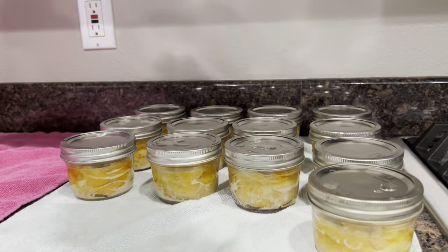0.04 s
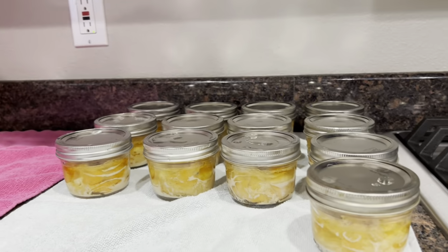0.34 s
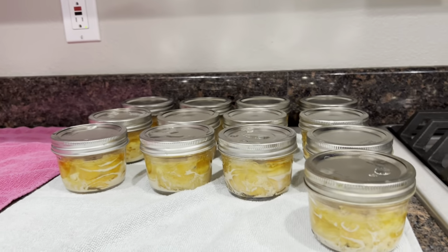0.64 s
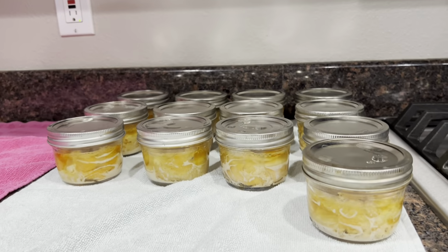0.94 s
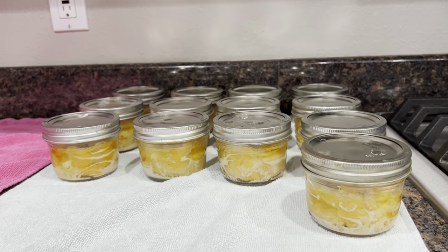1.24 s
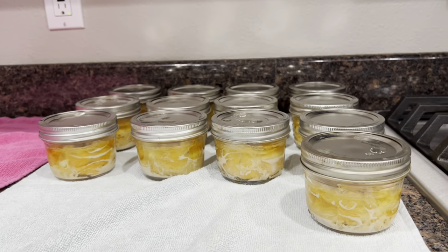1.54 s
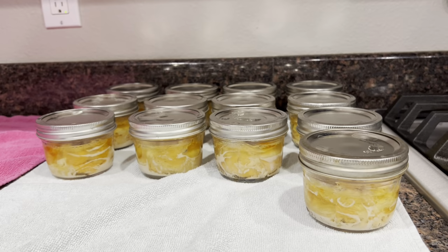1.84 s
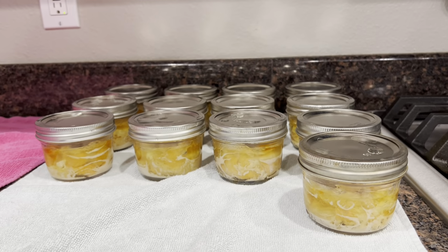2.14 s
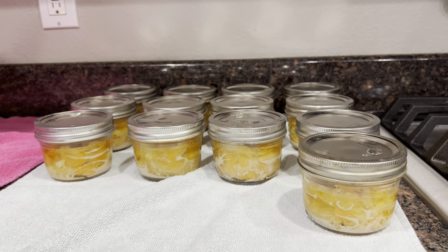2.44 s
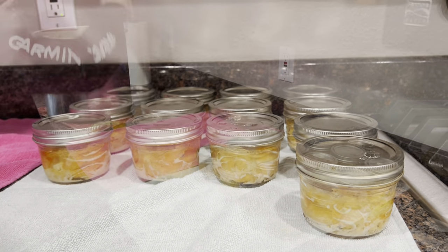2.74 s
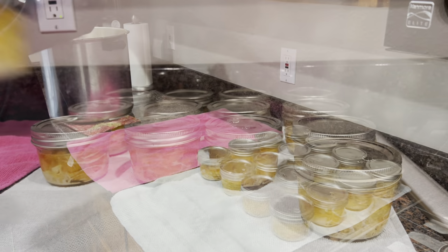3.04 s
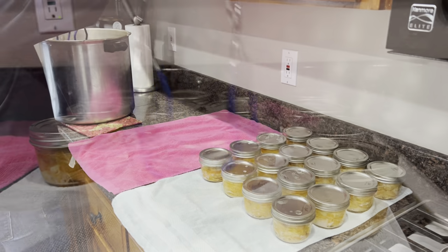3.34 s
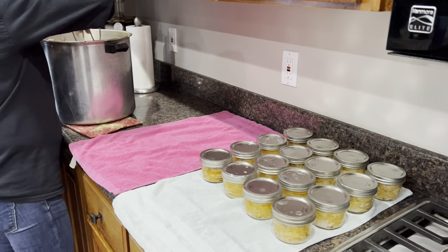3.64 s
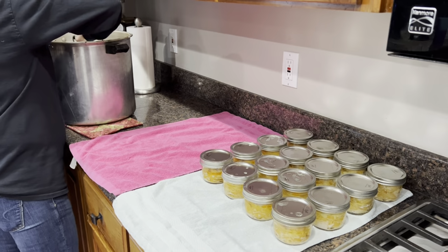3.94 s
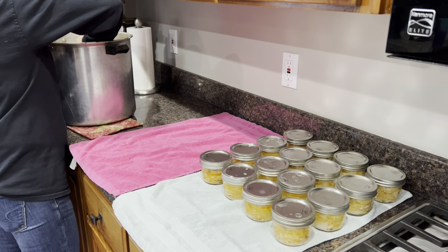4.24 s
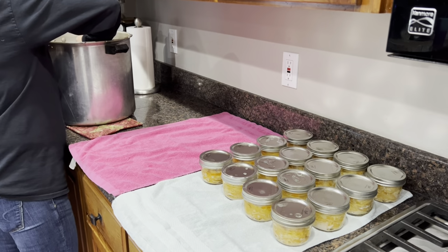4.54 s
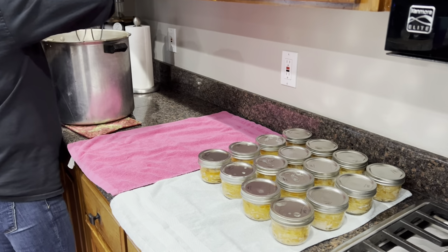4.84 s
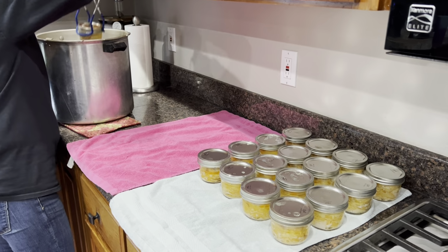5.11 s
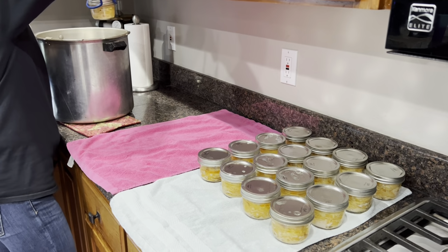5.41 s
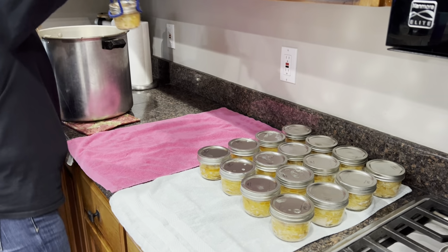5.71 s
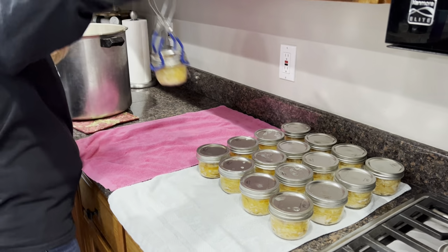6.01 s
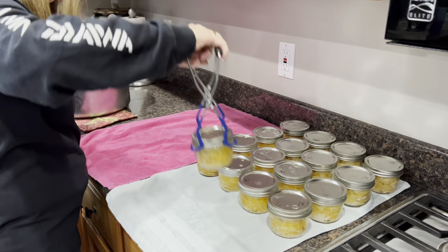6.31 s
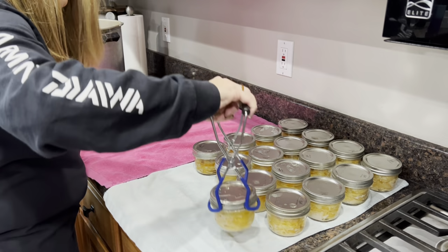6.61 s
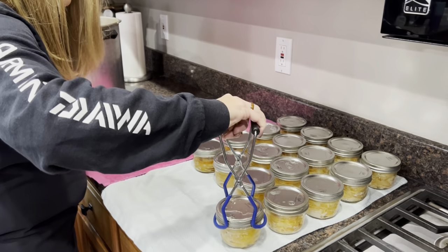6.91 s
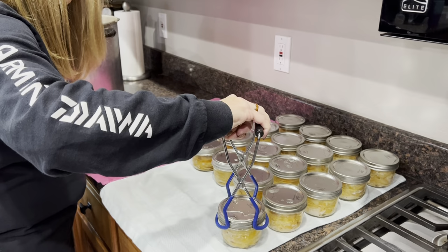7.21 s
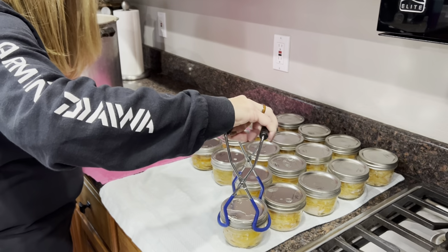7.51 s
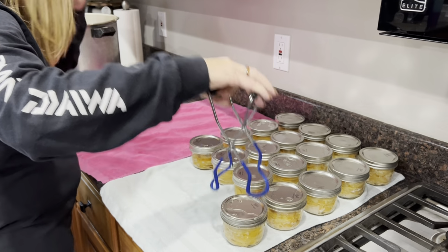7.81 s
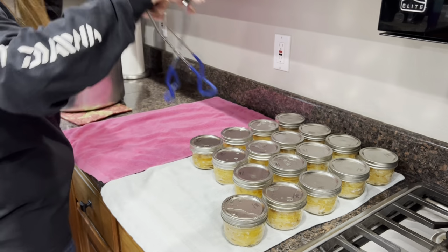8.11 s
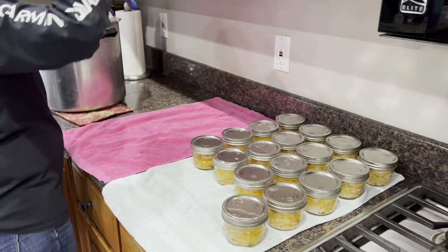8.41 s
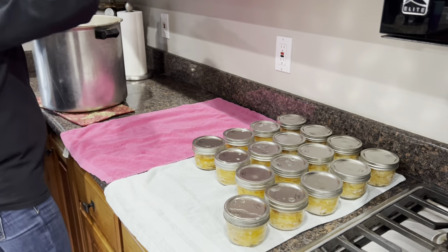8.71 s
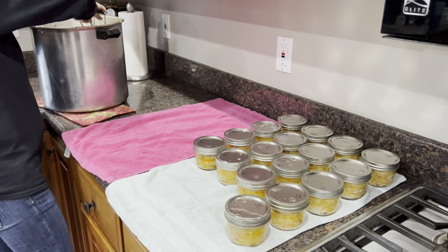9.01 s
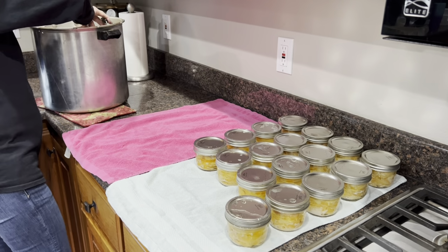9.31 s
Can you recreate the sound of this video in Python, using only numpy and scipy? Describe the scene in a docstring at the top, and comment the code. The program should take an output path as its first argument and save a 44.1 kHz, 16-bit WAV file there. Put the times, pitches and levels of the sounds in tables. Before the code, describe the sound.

In a quiet kitchen with a low appliance hum, two metal jar lids pop with short, ringing pings as hot jars cool. Faint ticks come between. Wire tongs knock lightly inside a big metal pot with a small slosh of water. A third, brighter lid pings, then the tongs scrape and rattle as they let go of a jar. The sounds are fairly close, with a short ring from the hard room.

```python
"""Three lids of hot preserving jars snap down under the vacuum and ping as they cool on a kitchen counter.
Wire tongs slide and knock in the canning pot, carry a jar over, then scrape and rattle as they let it go.
Cooling metal ticks and water sloshes in between, among faint tones, breathy puffs and swishes.
Kitchen appliances hum underneath, and the hard room rings after each sound."""
import sys
import numpy as np
from scipy import signal
from scipy.fft import rfft, irfft
from scipy.io import wavfile
from scipy.ndimage import uniform_filter1d

SR = 44100
rng = np.random.default_rng(int(sys.argv[2]) if len(sys.argv) > 2 else 0)


def store_wav(level_fs):
    """Save 16-bit WAV to argv[1]."""
    pcm = np.round(np.clip(np.atleast_2d(level_fs), -1, 1) * 32767)
    wavfile.write(sys.argv[1], SR, pcm.T.astype(np.int16))


N = 412335
TIME = np.arange(N) / SR
AGE = np.arange(SR // 2) / SR  # seconds since a hit


def amp(db):
    """Decibels to gain."""
    return 10 ** (np.asarray(db) / 20)


def unit(x):
    """Scales to rms 1."""
    return x / np.sqrt(np.mean(x ** 2) + 1e-20)


def read(curve, hz):
    """Reads a curve on a log-frequency axis."""
    points_hz, values = np.transpose(curve)
    return np.interp(np.log(hz + 1), np.log(points_hz + 1), values)


def add(mix, start, sound):
    """Mixes a stereo sound in at a start in seconds."""
    part = mix[:, round(start * SR):][:, :sound.shape[-1]]
    part += sound[..., :part.shape[-1]]


def rise(attack):
    """A smooth fade-in for a hit, over attack seconds."""
    return np.sin(np.pi / 2 * np.minimum(AGE / attack, 1)) ** 2


def envelope(start, attack, hold, release):
    """Rises from 0 to 1, holds and falls back; times in seconds."""
    return np.interp(TIME, start + np.cumsum([0, attack, hold, release]), [0, 1, 1, 0])


def band(centre_hz, octaves):
    """A noise colour with one broad hump."""
    hz = np.geomspace(50, 20000, 40)
    return np.transpose([hz, -4 * (np.log2(hz / centre_hz) / octaves) ** 2])


def noise(colour, size, likeness, tilt_db=0.):
    """Coloured stereo noise, partly alike left and right, tilted by tilt_db per octave above 1 kHz."""
    hz = np.fft.rfftfreq(size, 1 / SR)
    left, other = rfft(rng.standard_normal((2, size)))
    right = likeness * left + np.sqrt(1 - likeness ** 2) * other
    eq_db = read(colour, hz) + tilt_db * np.log2(np.maximum(hz, 1000) / 1000)
    return unit(irfft(np.array([left, right]) * amp(eq_db), size))


def burst(colour, t60, tilt_db=0., likeness=0.39):
    """The crack of a blow: noise that falls 60 dB in t60 seconds."""
    return noise(colour, len(AGE), likeness, tilt_db) * amp(-60 * AGE / t60)


def grainy_swell(middle, length, db, centre_hz, octaves):
    """Grainy noise that swells and fades around a midpoint; returns its start and its sound."""
    size = round(length * SR)
    grain = amp(1.6 * unit(uniform_filter1d(rng.standard_normal(SR), 200)))
    texture = noise(band(centre_hz, octaves), SR, likeness=.4) * grain
    return max(middle - length / 2, 0), amp(db) * texture[:, :size] * signal.windows.tukey(size, .7)


def ring(modes):
    """Dying sines of alternating sign, phase-shifted between left and right: modes x channels x time."""
    hz, db, t60, lead = np.transpose(modes)[:, :, None, None]
    sign = (-1) ** np.arange(len(modes))[:, None, None]
    phase = 2 * np.pi * hz * AGE + lead * np.array([[.5], [-.5]])
    return sign * amp(db - 60 * AGE / t60) * np.sin(phase)


def struck(modes, detune, spread_db, tilt_db=0.):
    """Every blow lands on another spot, which shifts and reweights the modes."""
    varied = []
    for hz, db, t60, lead in modes:
        pitch = hz * (1 + detune * rng.standard_normal())
        level = db + spread_db * rng.standard_normal() + tilt_db * np.log2(hz / 3000)
        varied.append((pitch, level, t60, lead))
    return ring(varied).sum(0)


def wavering(hz, width_hz):
    """A tone whose strength and phase drift, smearing its pitch over a narrow band."""
    offset_hz = np.fft.fftfreq(N, 1 / SR)
    drift = np.fft.ifft(np.fft.fft(rng.standard_normal(N)) * np.exp(-(offset_hz / width_hz) ** 2))
    return unit((drift * np.exp(2j * np.pi * hz * TIME)).real)


# The kitchen's reverb. Each row: frequency in Hz, decay (t60) in seconds.
ROOM_DECAY = [(150, 0.37), (500, 0.48), (1000, 0.54), (2500, 0.52), (4500, 0.46), (7000, 0.44),
              (9000, 0.43), (11500, 0.34), (15000, 0.23)]
# Slaps off counter and wall. Each row: left delay and right delay in seconds, relative level in dB.
ECHOES = [(.0031, 0.004, -11), (.0068, 0.0054, -11.5), (0.0128, .0127, -17)]
def kitchen(sound, room_db, pan_db=0):
    """The direct sound, a few near reflections, then a diffuse tail that dies band by band."""
    hz, t, spectrum = signal.stft(rng.standard_normal((2, len(AGE))), SR, nperseg=256)
    decay = amp(-60 * t / read(ROOM_DECAY, hz)[:, None])
    tail = signal.istft(spectrum * decay, SR, nperseg=256)[1][:, :len(AGE)]
    wet = signal.fftconvolve(sound, tail * np.clip((AGE - .002) / 0.011, 0, 1), axes=1)
    wet *= np.sqrt((sound ** 2).sum() / (wet ** 2).sum())
    near = np.zeros((2, len(AGE)))
    near[:, 0] = amp([pan_db / 2, -pan_db / 2])
    for left, right, db in ECHOES:
        near[[0, 1], [round(left * SR), round(right * SR)]] += amp(db + room_db / 2)
    return signal.fftconvolve(sound, near, axes=1) + amp(room_db) * wet


# The bed of rumble and hiss. Each row: frequency in Hz, relative level in dB.
AIR_COLOUR = [(25, -20.5), (45, -4), (72, -0.5), (123, -8.5), (160, -14), (256, -14), (340, -19),
              (714, -26), (887, -32), (1100, -31), (1790, -34), (3200, -41.5), (5000, -45), (8600, -46),
              (10200, -60), (12000, -47), (16000, -67)]
# Its stereo image, wider toward the top. Each row: frequency in Hz, left-right likeness from 0 to 1.
AIR_LIKENESS = [(60, 0.99), (130, 0.89), (290, 0.83), (640, 0.43), (1410, 0.36), (3100, 0.17), (6820, 0.27),
                (15000, 0.1)]
# Appliance hum and the fan's early and late whine. Each row: pitch in Hz, level in dB, width in Hz.
HUM = [(81.7, -66.5, 7), (122.2, -68.5, 5), (248.4, -76.5, 4)]
EARLY_WHINE = [(500, -80, 30), (706, -82, 30), (980, -80.5, 50), (1034, -79, 8), (1056, -80.5, 35)]
LATE_WHINE = [(1113, -85.5, 59)]
# The bed's early and late balance. Each holds: rumble, hiss and hum trims in dB.
EARLY_TRIMS = (0.5, -1.5, 2)
LATE_TRIMS = (-0.79, -2.25, -1)
def appliances():
    """Rumble, hum, soft hiss and a thin fan whine, easing into a slightly quieter tone."""
    air = amp(-60.5) * noise(AIR_COLOUR, N, read(AIR_LIKENESS, np.fft.rfftfreq(N, 1 / SR)))
    rumble = signal.sosfiltfilt(signal.butter(2, 1200, fs=SR, output="sos"), air)
    hiss = air - rumble
    hum = sum(amp(db) * wavering(hz, width) for hz, db, width in HUM)
    lull = amp(-4.5 * envelope(2.61, attack=0.53, hold=0.89, release=0.14))
    blend = np.clip((TIME - 2.7) / 0.65, 0, 1)
    tones = [(1 - blend, EARLY_TRIMS, EARLY_WHINE), (blend, LATE_TRIMS, LATE_WHINE)]
    out = np.zeros((2, N))
    for share, (rumble_db, hiss_db, hum_db), fan in tones:
        whine = sum(amp(db) * wavering(hz, width) for hz, db, width in fan)
        lows = lull * (amp(rumble_db) * rumble + amp(hum_db) * hum)
        out += share * (lows + amp(hiss_db) * hiss + whine)
    drone = amp(-67.5) * envelope(1.77, attack=0.39, hold=0.71, release=0.56) * wavering(128, width_hz=9)
    brief_dip = amp(-43 * envelope(4.625, attack=0.0015, hold=0.02, release=0.0015))
    return (out + drone) * brief_dip


# Light ticks. Each row: start in seconds, relative level in dB, brightness (higher is crisper).
TICKS = [(0.153, -60, -18), (0.3987, -47, -8.5), (1.7123, -53.5, -20), (1.732, -51, -22.5),
         (3.135, -54.5, -2), (3.456, -40.5, -12), (4.464, -65, -12), (5.275, -63, 0), (9.0175, -59, -13.5)]
# A tick's EQ. Each row: frequency in Hz, relative level in dB.
TICK_COLOUR = [(200, -15), (700, -11), (1400, -1), (2800, 2), (6000, -2), (9000, -7), (10200, -22),
               (12000, -9), (16000, -35)]
def ticks():
    """Cooling lids and jar rings give little clicks with no pitch of their own."""
    out = np.zeros((2, N))
    for start, db, brightness in TICKS:
        click = burst(TICK_COLOUR, t60=0.068, tilt_db=0.57 * (brightness + 8.5))
        add(out, start, amp(db - 6.5) * kitchen(click, room_db=-2.0))
    return out


# Soft handling noises. Each row: midpoint in seconds, length in seconds, level in dB.
SCUFFS = [(0.613, 0.098, -71.5), (0.755, 0.086, -68.5), (1.067, 0.13, -76), (2.511, 0.075, -77),
          (3.115, 0.047, -74.5), (4.99, 0.057, -68.5), (5.298, 0.26, -75.5), (8.713, .12, -76),
          (8.888, 0.074, -71.5)]
def scuffs():
    """Brief rubs of handling: the quicker the scuff, the brighter it is."""
    out = np.zeros((2, N))
    for middle, length, db in SCUFFS:
        centre_hz = 2593 * (0.042 / length) ** 0.55
        add(out, *grainy_swell(middle, length, db, centre_hz, octaves=0.76))
    return kitchen(out, room_db=-2.5)[:, :N]


# Faint tones. Each row: start in seconds, pitch in Hz, level in dB, attack and t60 in seconds.
FAINT_TONES = [(1.04, 715, -56, 0.0048, 0.099), (5.195, 1570, -63, .04, .2),
               (5.364, 2110, -49.5, 0.024, 0.095), (5.372, 1410, -50.5, 0.025, 0.097),
               (8.66, 1600, -64, .04, .25)]
def faint_tones():
    """Faint, softly swelling tones that die away quickly, most of them near 1.6 kHz."""
    out = np.zeros((2, N))
    for start, hz, db, attack, t60 in FAINT_TONES:
        tone = ring([(hz, db, t60, .6)])[0] * rise(attack)
        add(out, start, kitchen(tone, room_db=-5.5))
    return out


# The rush's EQ, fullest in the mids. Each row: frequency in Hz, relative level in dB.
RUSH_COLOUR = [(120, -32.5), (300, -14), (730, -7), (1400, -11), (4000, -18.5), (9000, -24), (10200, -41),
               (12000, -31), (16000, -35.5)]
def rush():
    """A soft rush of noise swells up just before the first pop."""
    swell = envelope(1.285, attack=0.079, hold=0.068, release=.04) ** 2
    return amp(-50) * swell * noise(RUSH_COLOUR, N, likeness=0.56)


# Each lid's ping. Each row: pitch in Hz, relative level in dB, t60 in seconds, left lead in radians.
NEAR_LID = [(788, -19, 0.026, .5), (877, -29.5, .32, .8), (1228.2, -31, .29, 0), (1260, -32.5, .22, 0),
            (1576, -29, 0.24, 1.5), (1766, -10.8, .112, -0.84), (1771, -40, .4, -.8),
            (1832, -23.5, 0.033, .5), (2030, -38, .08, .5), (2159, -34, 0.12, .5), (2379, -34, .11, .5),
            (2590, -24.5, 0.06, 1.4), (2570, -40, .33, .8), (2650, -25, .125, 1.4), (2736, -27.5, .05, .6),
            (2902, -38, .13, .5), (3090, -37, 0.11, .6), (3343, -38, .12, .5), (3540, -29, 0.052, .8),
            (3520, -46, 0.25, .5), (4300, -42, .13, .4), (4500, -34.5, .06, 0.65), (4942, -34, 0.041, 0.31),
            (5030, -49, 0.29, .4), (5660, -46, .11, .4), (6130, -42.5, .05, 0.27), (6820, -41.5, .08, .3)]
DULL_LID = [(732, -37.5, 0.095, 0), (944, -30, 0.12, 2.5), (991, -19, 0.1, 1.33), (1063, -30.5, 0.13, 1.5),
            (1380, -33.5, .1, 2), (2150, -39, 0.12, 2.6), (2240, -26.5, 0.077, 2),
            (2350, -28.5, .055, -3.5), (2710, -33, .08, 2), (2810, -30.5, 0.059, -1.8),
            (3693, -51, 0.073, 1.5), (3785, -45.5, 0.05, 1), (3908, -51.5, .07, 2.5),
            (4060, -54.5, .1, 0.5), (5033, -63.5, .1, 1), (5100, -56.5, .08, 1.5), (5310, -61.5, .08, 2)]
BRIGHT_LID = [(756, -38.5, 0.048, 0.0077), (1001, -28, 0.062, 0.75), (1140, -39, 0.077, 0.36),
              (1710, -26.5, 0.02, 0.84), (2000, -30.5, 0.11, 1.5), (2048.5, -30.5, 0.15, 0.54),
              (2066, -35, 0.2, .5), (2130, -32, 0.11, 1.1), (2210, -40, .1, .8), (2850, -52, .12, 1),
              (3203, -51, .1, 1), (3887, -45, .13, 1), (3978, -44, 0.12, 1), (4570, -57, .3, .6),
              (5380, -30, 0.023, -.8), (5613, -46.5, 0.1, 0.25), (8280, -54, 0.16, 0.17),
              (11200, -53, 0.072, 0.98)]
# The crack of each lid buckling. Each row: frequency in Hz, relative level in dB.
NEAR_CRACK = [(100, -36.5), (300, -21.5), (500, -11.5), (1000, -2.5), (2500, -2.5), (5000, -17.5),
              (6000, -23.5), (8500, -24), (10000, -60), (16000, -68)]
DULL_CRACK = [(100, -32.5), (240, -6), (500, -23), (1000, 10.5), (1700, -9), (2650, 11), (3150, -23),
              (3850, -12.5), (4600, -30), (5200, -27.5), (7000, -52), (16000, -64)]
BRIGHT_CRACK = [(100, -29.5), (220, 1), (330, -2.5), (500, -12), (1000, -20.5), (2200, 12), (2900, 5),
                (4000, 4.5), (4650, -2), (5500, 4), (6500, -11), (8500, -8.5), (10200, -44.5), (11500, -9),
                (13000, -60)]
# The three pops. Each row: start and snap delay in seconds, first crack against the snap in dB,
# ping gain in dB, ping attack in seconds, ping reverb in dB, snap level in dB, crack t60 in seconds,
# crack reverb in dB, pan to the left in dB.
POPS = [(1.4206, 0.00073, -9.5, 2, 0.0015, -19.5, -19, 0.039, -8, 2.5),
        (2.067, 0.0032, -4.5, -1, 0.0045, -8, -29.5, 0.06, -3.5, 3.5),
        (6.7533, .005, -8, 6, 0.0083, -5, -24.5, 0.052, -0.5, 4.5)]
def lid_pops():
    """Each lid gives with a light crack, snaps through with a hard one, and its dome rings."""
    out = np.zeros((2, N))
    lids = [(NEAR_LID, NEAR_CRACK), (DULL_LID, DULL_CRACK), (BRIGHT_LID, BRIGHT_CRACK)]
    for pop, (modes, colour) in zip(POPS, lids):
        start, delay, first_db, ping_db, attack, ping_room_db, snap_db, t60, crack_room_db, pan_db = pop
        for when, db in [(start, snap_db + first_db), (start + delay, snap_db)]:
            crack = amp(db) * burst(colour, t60, likeness=0.53) * rise(.001)
            add(out, when, kitchen(crack, crack_room_db, pan_db))
        for mode in ring(modes):
            ping = amp(ping_db) * mode * rise(attack)
            add(out, start + delay, kitchen(ping, ping_room_db, pan_db))
    return out


# Breathy puffs. Each row: midpoint and length in seconds, level in dB, centre in Hz, width in octaves.
PUFFS = [(2.93, .24, -79, 1600, .3), (6.321, .22, -81.5, 1497, 1.3), (8.45, .3, -83, 1600, .9),
         (8.72, .14, -81, 1650, .35), (8.93, .22, -80, 1550, .25)]
def puffs():
    """Faint, breathy puffs of noise near 1.6 kHz, most of them narrow."""
    out = np.zeros((2, N))
    for puff in PUFFS:
        add(out, *grainy_swell(*puff))
    return kitchen(out, room_db=-2.5)[:, :N]


# EQs of the slide, the pot's clank and the wire's click. Each row: frequency in Hz, relative level in dB.
SLIDE_COLOUR = [(500, -12), (1200, 8), (1600, -0.5), (2200, 4.5), (3300, -8), (4300, -3.5), (5400, -7),
                (6700, 7.5), (8500, -7.5), (10000, -33)]
POT_COLOUR = [(240, -27), (400, -15.5), (730, -6), (1710, -19.5), (2290, -5.5), (2970, -19), (3470, -16.5),
              (8500, -31), (16000, -52)]
WIRE_COLOUR = [(200, -35), (600, -12), (1200, 1), (2200, 6), (4500, 3.5), (8900, 6.5), (10200, -9),
               (11700, 9), (13500, -7), (16000, -4)]
# The pot's ring. Each row: pitch in Hz, relative level in dB, t60 in seconds, left lead in radians.
POT_MODES = [(734, -8, 0.33, .6), (899, -7, 0.16, -0.52), (1300, -10, 0.12, 0.55), (1404, -2, 0.067, 0.61),
             (2277, -1.5, 0.14, .6), (2338, 0, 0.16, -0.85), (2820, -10.5, 0.061, .6),
             (3475, -5, 0.07, 0.66), (4870, -4, 0.06, -0.54), (6380, -3, 0.077, 0.46),
             (8350, -10, .045, -0.65), (8470, -3, 0.057, .6)]
# Tongs against the pot. Each row: time in seconds, relative level in dB, ring gain in dB.
KNOCKS = [(4.064, -41.5, -6.5), (4.228, -42, -8), (4.285, -57, -5), (4.394, -55.5, -16), (4.407, -52, -8)]
def tongs_in_pot():
    """Wire tongs slide in the big pot and knock against it, setting it ringing."""
    slide = envelope(3.693, attack=0.22, hold=0.16, release=0.36)
    out = amp(-68) * slide * noise(SLIDE_COLOUR, N, likeness=0.15)
    for when, db, ring_db in KNOCKS:
        knock = amp(-8.5) * burst(POT_COLOUR, t60=0.2) + amp(-11) * burst(WIRE_COLOUR, t60=0.077)
        knock += amp(ring_db) * struck(POT_MODES, detune=.004, spread_db=2.5)
        add(out, when - .005, amp(db) * kitchen(knock * rise(0.01), room_db=-2.5))
    return out


# Water stirring. Each row: midpoint and length in seconds, level in dB, centre in Hz, width in octaves.
SLOSHES = [(4.314, 0.11, -62, 716, 0.59), (5.396, 0.083, -70, 1000, 0.78), (8.448, .05, -70, 600, 0.94)]
def sloshes():
    """Dull stirs of water and handling at the pot."""
    out = np.zeros((2, N))
    for slosh in SLOSHES:
        add(out, *grainy_swell(*slosh))
    return kitchen(out, room_db=-2.5)[:, :N]


# Airy swishes. Each row: midpoint in seconds, length in seconds, level in dB.
SWISHES = [(5.997, 0.71, -82), (8.277, 0.22, -83)]
def swishes():
    """A sleeve swishes as the arm swings out and back."""
    out = np.zeros((2, N))
    for swish in SWISHES:
        add(out, *grainy_swell(*swish, centre_hz=3300, octaves=0.95))
    return kitchen(out, room_db=-2.5)[:, :N]


# The jar's body. Each row: pitch in Hz, level in dB, t60 in seconds, left lead in radians.
JAR_MODES = [(620, -51, 0.033, 0.57), (652, -42.5, 0.11, .5), (1036, -54.5, 0.099, -.5),
             (1950, -64, 0.025, .5), (3350, -66, 0.036, .5), (4200, -70, 0.025, -.5)]
def jar_bump():
    """The carried jar shifts in the tongs with a hollow knock."""
    out = np.zeros((2, N))
    knock = ring(JAR_MODES).sum(0) * rise(0.0016)
    add(out, start=6.149, sound=kitchen(knock, room_db=-8.0))
    return out


# The wire's ring. Each row: pitch in Hz, relative level in dB, t60 in seconds, left lead in radians.
WIRE_MODES = [(1163, -19, 0.12, 0.69), (1440, -19, 0.15, -0.42), (1850, -17, 0.12, .9),
              (2977, -10, 0.079, 0.91), (3320, 0, 0.035, -1.1), (3569, -0.5, 0.046, 0.24),
              (4080, 0.5, 0.028, -0.62), (6400, -14, 0.2, 0.73), (7800, -10, 0.16, -.9),
              (8543, -12, 0.13, 1.1), (9230, -8, 0.05, -1.5), (11370, -6, 0.054, 1.1)]
# The rattle. Each row: start in seconds, relative level in dB, brightness, t60 in seconds,
# ring gain in dB.
CLACKS = [(7.4683, -53, -2, .03, -28), (7.4995, -49, -28, .02, -26), (7.536, -47, -26, 0.021, -26),
          (7.5495, -34, -31, 0.013, -26), (7.581, -43, -19, .02, -26), (7.595, -46, -8, 0.023, -28),
          (7.602, -40, -3, .01, -28), (7.6388, -37, -41, 0.028, -23), (7.654, -42, -26, .02, -23),
          (7.6697, -30.5, -7, .03, -23), (7.688, -43, -6, .02, -22), (7.703, -38, -3, 0.039, -24),
          (7.721, -37.5, -24, 0.034, -18), (7.7417, -24, 2, .03, -19), (7.7446, -26, -17, 0.022, -20),
          (7.7483, -30, -7, 0.016, -23), (7.753, -31, -10, 0.027, -19), (7.767, -39, -22, .03, -18)]
def tongs_rattle():
    """The tongs clack open and slip off the jar, ringing more as the wire comes free."""
    out = np.zeros((2, N))
    for start, db, brightness, t60, ring_db in CLACKS:
        tilt_db = 0.28 * (brightness + 0.5)
        clack = amp(-13.0) * burst(WIRE_COLOUR, t60, tilt_db, likeness=0.37)
        clack += amp(ring_db) * struck(WIRE_MODES, detune=.012, spread_db=2.4, tilt_db=tilt_db)
        add(out, start, amp(db) * kitchen(clack * rise(0.0004), room_db=-11.0))
    return out


def tongs_scrape(slips_per_s=550, spread_db=3):
    """The opening tongs stick and slip on the jar in a run of tiny, uneven clicks."""
    slips = rng.random(N) < slips_per_s / SR
    strength = amp(spread_db * np.clip(rng.standard_normal(N), -2, 2)) * rng.choice([-1, 1], N)
    click = burst(band(centre_hz=2210, octaves=0.9), t60=0.018)
    scrape = unit(signal.oaconvolve((slips * strength)[None], click, axes=1)[:, :N])
    return amp(-59) * envelope(7.52, attack=0.17, hold=0.055, release=0.03) * scrape


def scene():
    """Jars, handling and tongs over the appliance bed, plus faint tones, a soft rush and puffs."""
    jars = ticks() + lid_pops() + jar_bump()
    handling = scuffs() + sloshes() + swishes()
    tongs = tongs_in_pot() + tongs_rattle() + tongs_scrape()
    return appliances() + jars + handling + tongs + faint_tones() + rush() + puffs()


def record(dry):
    """Trims the deepest bass and the very top of the treble."""
    low_cut = signal.butter(8, 37, "highpass", fs=SR, output="sos")
    high_cut = signal.firwin(511, 16250, window=("kaiser", 9), fs=SR)
    return signal.oaconvolve(signal.sosfilt(low_cut, dry), high_cut[None], "same")


dry = scene()
out = record(dry)
store_wav(out)
```